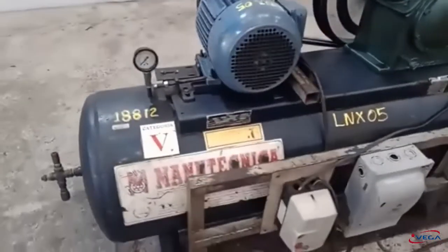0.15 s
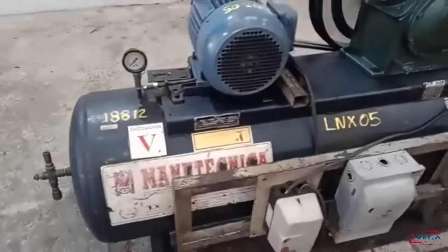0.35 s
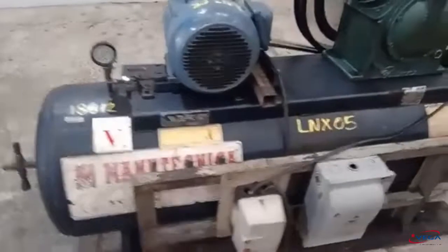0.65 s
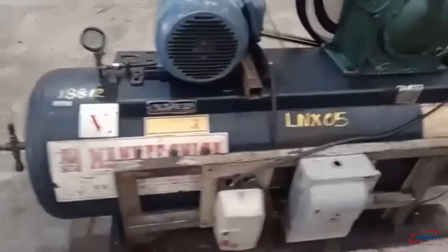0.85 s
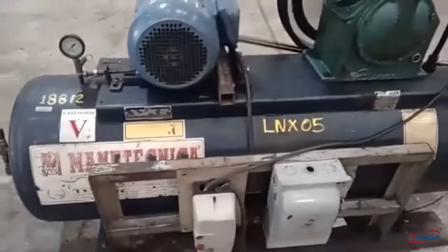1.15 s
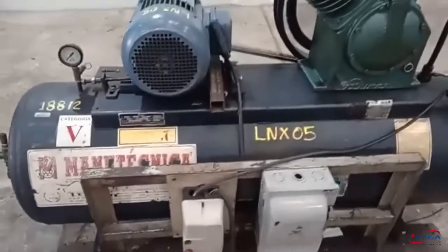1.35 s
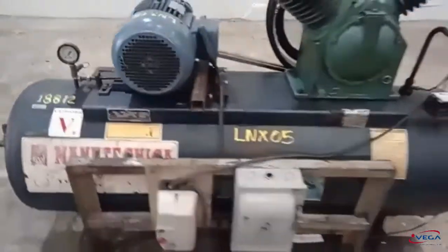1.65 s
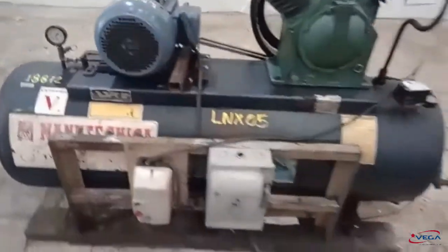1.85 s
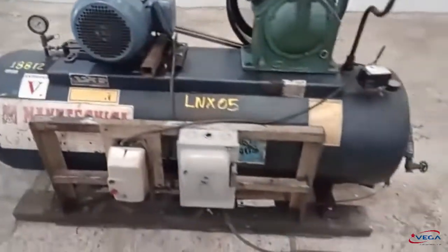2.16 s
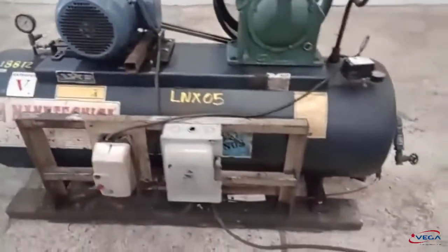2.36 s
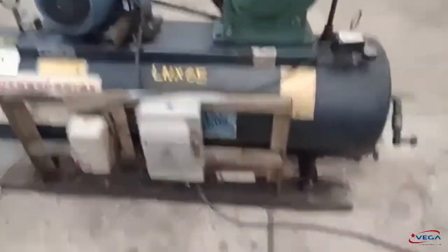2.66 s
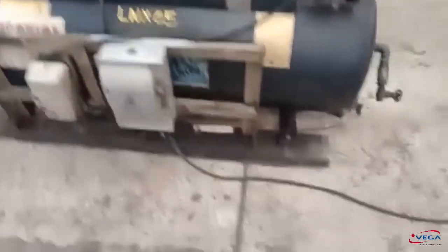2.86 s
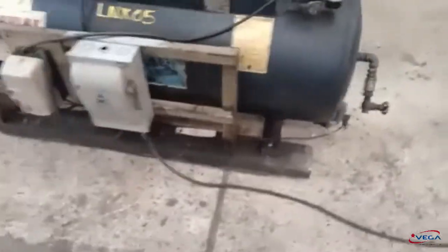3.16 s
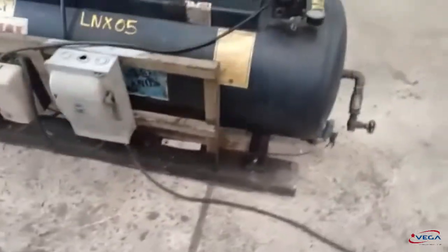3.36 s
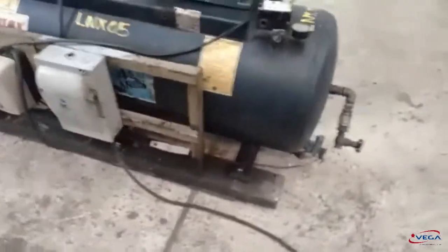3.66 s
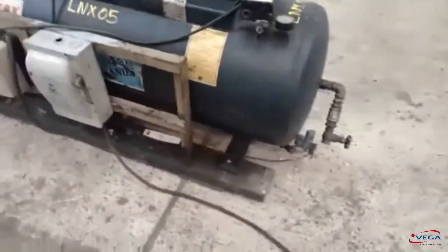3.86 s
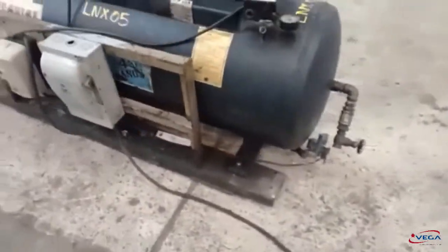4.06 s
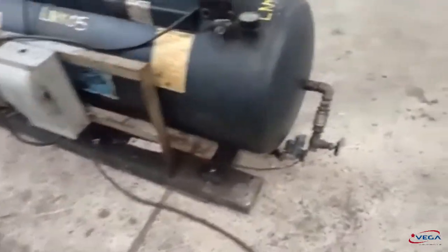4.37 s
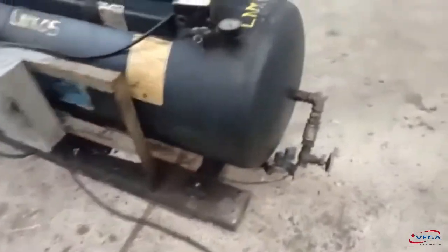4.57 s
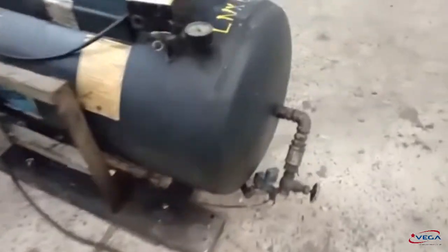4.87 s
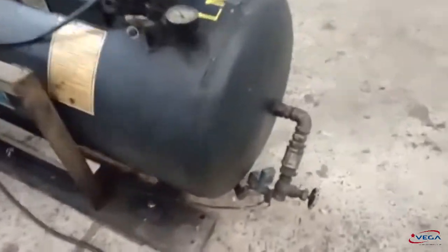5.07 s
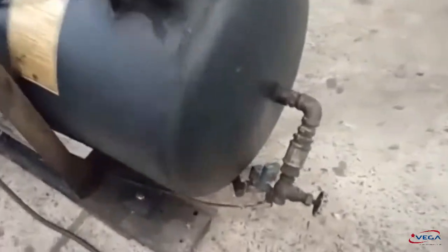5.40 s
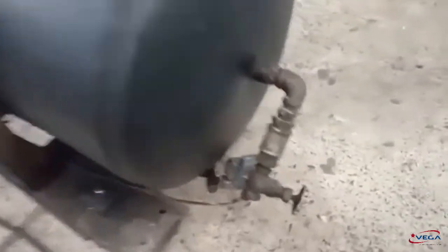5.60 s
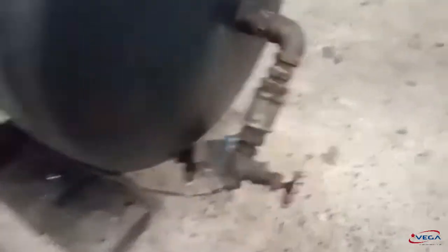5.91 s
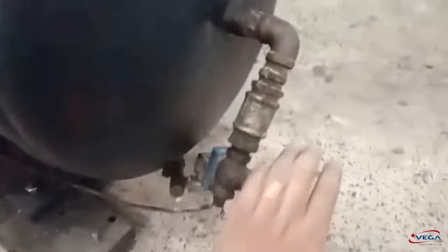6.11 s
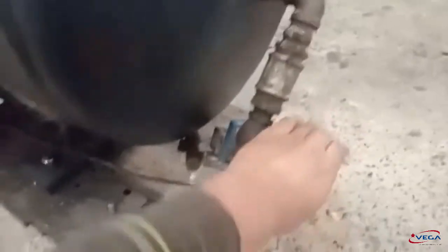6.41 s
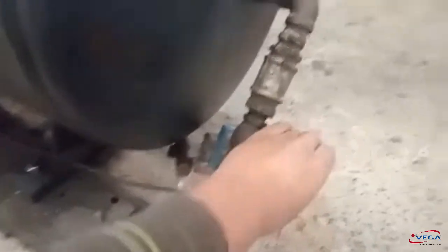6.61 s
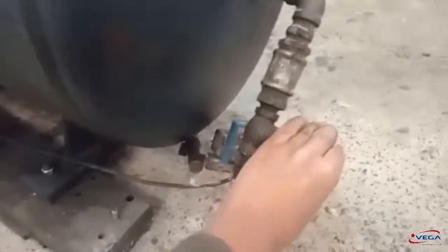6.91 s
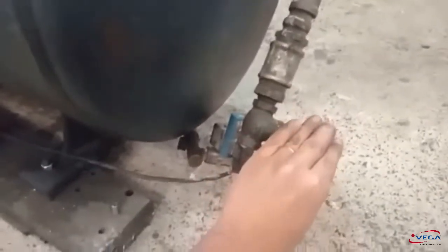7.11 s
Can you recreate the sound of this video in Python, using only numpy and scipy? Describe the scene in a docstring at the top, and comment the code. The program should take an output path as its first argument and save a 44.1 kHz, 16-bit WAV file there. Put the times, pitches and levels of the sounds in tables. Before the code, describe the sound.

In a workshop with a short echo, a belt-driven compressor putters quickly and quietly under a piercing air hiss. The microphone walks from pump to outlet valve: hiss stays almost constant in level but its tone shifts, fuller and whistlier near the pipe. Low rumble swells briefly before the tank end, then drops. Tiny dropouts roughen the sound; finally hiss covers everything.

```python
"""A compressor chugs while air hisses and whistles from a leak; the hiss shifts in level and colour.
The listener walks along the tank from the pump to the valve, and the chug fades out before the end.
The chug is a fluttering valve plate with a thump and rings, repeated each turn of the pump.
The hiss is noise shaped by pipe resonances that move during the walk; low rumble and air noise
at the microphone lie underneath."""
import sys
import numpy as np
from scipy import signal
from scipy.io import wavfile
from scipy.ndimage import uniform_filter1d

SR = 44100
rng = np.random.default_rng(int(sys.argv[2]) if len(sys.argv) > 2 else 0)


def generate_wav(sig):
    """Save sig (samples, or channels by samples) to the path in sys.argv[1] as 16-bit PCM at SR."""
    pcm = np.round(np.clip(np.atleast_2d(sig).T, -1, 1) * 32767).astype(np.int16)
    wavfile.write(sys.argv[1], SR, pcm)


def voltage_ratio(decibels):
    """Convert decibels (scalar or array-like) to amplitude ratios, 20 dB per decade."""
    exponent = np.asarray(decibels, float) / 20
    return 10 ** exponent


N = 319725  # length in samples

# The walk to the valve: t/s, nearness (0 far to 1 near), centre of the main hiss band f/Hz,
# second band level/dB, treble level/dB
WALK_TO_VALVE = [(0, 0.3, 6040, -30, -30.5), (1.25, 0.23, 5840, -30, -32), (1.5, 0.3, 5930, -25.5, -31),
                 (1.75, .05, 5800, -30, -31.5), (2.3, 0, 5950, -32.5, -31.5), (2.75, 0.4, 5200, -21.5, -35),
                 (3.0, 0.05, 5730, -26, -30), (3.3, .2, 6330, -23.5, -28), (3.75, 0.1, 6200, -24.5, -24.5),
                 (4.2, 0.2, 6400, -36.5, -29), (4.5, 0.3, 6440, -26.5, -27.5), (5.0, 0.2, 6800, -27, -27.5),
                 (5.4, .8, 6840, -21, -29.5), (5.75, 1, 6850, -19, -28), (6.1, 1, 6740, -20.5, -27.5),
                 (7.25, 0.9, 6480, -21, -27)]


def evened(x):
    """Scales to rms 1."""
    return x / np.sqrt(np.mean(x ** 2) + 1e-20)


def columns(rows, t):
    """Reads every column of a curve table at the times t."""
    s, *rest = np.transpose(rows)
    return [np.interp(t, s, column) for column in rest]


def unit(gain):
    """Scales a spectrum to unit power in every frame."""
    return gain / np.sqrt((gain ** 2).sum(-1, keepdims=True))


def colour(points, hz):
    """Turns a spectrum table, read on a log frequency axis, into a gain of unit power."""
    f, db = np.transpose(points)
    curve_db = np.interp(np.log(hz + 1), np.log(f + 1), db)
    return unit(voltage_ratio(curve_db) * np.ones((1, 1)))


def bump(shape, hz, centre_hz):
    """Carries a resonance shape along a moving centre, at unit power."""
    offset_hz, db = np.transpose(shape)
    return unit(voltage_ratio(np.interp(hz[None] - centre_hz[:, None], offset_hz, db)))


def noise(gain, size):
    """Noise from random short-time spectra, frames x bins; unit power per frame gives rms 1."""
    a, b = rng.standard_normal((2,) + gain.shape)
    spectra = a + 1j * b
    flat = signal.istft(spectra.T, nperseg=size, noverlap=size * 3 // 4)[1]
    x = signal.istft((spectra * gain).T, nperseg=size, noverlap=size * 3 // 4)[1]
    return x[:N] * np.sqrt(gain.shape[1]) / np.std(flat)


def patches(frames, bins, long, wide):
    """Random field of rms 1, smoothed over time and frequency."""
    field = rng.standard_normal((frames, bins))
    smooth = uniform_filter1d(field, long, axis=0)
    return evened(uniform_filter1d(smooth, wide, axis=1))


def resonate(x, hz, width):
    """A resonance of gain 1 at hz: a wider one dies away faster."""
    pole = np.exp((2j * np.pi * hz - np.pi * width) / SR)
    return 2 * signal.lfilter([1 - abs(pole)], [1, -pole], x).real


def ring(x, modes):
    """Blows into a set of modes, each ringing at its own pitch; rms 1."""
    total = 0
    for hz, width, db in modes:
        total = total + voltage_ratio(db) * resonate(resonate(x, hz, width), hz, 290) / width
    return evened(total)


def rumble():
    """Low noise of motor, belt and hall, with air and hand noise at the microphone."""
    # Loudness of the rumble over time: t/s, level/dB
    rumble_level = [(0, -38), (.66, -35.5), (2.44, -36), (2.82, -31.5), (3.0, -48), (3.65, -48),
                    (4.18, -38), (5.5, -39.5), (7.25, -33)]
    # Colour of the rumble: f/Hz, relative level/dB
    rumble_colour = [(35, -41), (60, -3), (155, 4), (284, 5), (402, 7.5), (496, -5), (579, 7), (766, 3),
                     (893, 8.5), (1360, -16.5), (1700, 8.5), (2210, 11), (3740, -120)]
    # Colour of the air and hand noise: f/Hz, relative level/dB
    handling_colour = [(8.8, -32), (15, 5), (110, 11), (140, -31), (240, -120)]
    hand_far_db, hand_near_db, hand_lumps_db = -71, -51.5, -0.5  # grows towards the valve

    hz, t = np.fft.rfftfreq(2048, 1 / SR), np.arange(N // 512 + 5) * 512 / SR
    rumble_db = columns(rumble_level, t)[0]
    near = columns(WALK_TO_VALVE, t)[0]
    hand_db = hand_far_db + (hand_near_db - hand_far_db) * near
    hand_db = hand_db + hand_lumps_db * patches(len(t), 1, long=20, wide=1)[:, 0]
    rumble_gain = voltage_ratio(rumble_db)[:, None] * colour(rumble_colour, hz)
    hand_gain = voltage_ratio(hand_db)[:, None] * colour(handling_colour, hz)
    lumps_db = 3.4 * patches(len(t), len(hz), long=5, wide=6)
    return noise(np.hypot(rumble_gain, hand_gain) * voltage_ratio(lumps_db), size=2048)


def pump():
    """Each turn the valve snaps open with a thump, flutters as air rushes in and rings intake and head."""
    # What reaches the listener of each stroke on the way through the standing waves:
    # t/s, flutter tone level/dB, its octave level/dB, third harmonic level/dB, head ring level/dB
    chug_levels = [(.07, -38, -33.5, -44, -37), (.5, -45, -34, -59, -46), (.75, -48, -42.5, -45, -44),
                   (1.15, -49, -43.5, -48.5, -45), (1.55, -39, -39, -36, -37.5),
                   (1.95, -36.5, -41.5, -44, -51), (2.35, -37, -60, -49, -51),
                   (2.72, -28.5, -38.5, -44, -43), (2.92, -34, -38, -39.5, -46), (3.12, -44, -51, -48, -42),
                   (3.33, -38, -41, -43, -41), (3.55, -46.5, -47, -64, -38.5),
                   (3.74, -44.5, -36.5, -65, -45), (4.1, -45, -42, -67, -46),
                   (4.35, -46, -37.5, -49, -44.5), (4.6, -45, -51.5, -38.5, -44.5),
                   (5.16, -49, -36.5, -53, -28.5), (5.4, -48, -47, -54, -41), (6.0, -50, -50, -62, -39.5),
                   (6.4, -54, -62, -51, -65)]
    # Ringing of the pump head: f/Hz, width/Hz, relative level/dB
    head_modes = [(1005, 38, 2), (1089, 40, 11), (1162, 24, -3.5), (1206, 51, 6)]
    # Ringing of the intake: f/Hz, width/Hz, relative level/dB
    intake_modes = [(686, 51, 4.5), (386, 43, -9.5)]
    stroke_s, first_s, flutter_hz = .10182, .0565, 297

    t = np.arange(N) / SR
    turn, since = np.divmod(t - first_s + stroke_s, stroke_s)  # turn count, seconds since it began
    luck = rng.standard_normal((int(turn[-1]) + 1, 5))[turn.astype(int)]  # no two turns are alike
    first_db, octave_db, third_db, head_db = columns(chug_levels, t)
    # Thump and intake follow only a share of the swings of the flutter and its octave
    thump_db = -51 + 0.33 * (first_db + 42)
    intake_db = -47.5 + 0.58 * (octave_db + 42)

    def window(start, rise, length, fall):
        """Opens steadily, stays open, then dies away; all times in seconds."""
        opening = np.clip((since - start) / rise, 0, 1)
        return opening * np.exp(-np.maximum(since - start - length, 0) / fall)

    out = np.zeros(N)
    harmonics = [(first_db, .002, .5), (octave_db, .006, .15), (third_db, .008, .7)]
    for k, (db, rise_s, rough) in enumerate(harmonics):
        hz = (k + 1) * flutter_hz
        gate = 0.025 + window(0.001, rise_s, .027, 0.004)
        gate = gate + 0.2 * window(0.066, 0.008, 0.013, 0.005)  # the small second cylinder follows
        glide_s = .0035 / (k + 1) ** 3 * np.exp(-since / .007)  # starts flat, then settles
        tone = np.sin(2 * np.pi * hz * (1 + .01 * luck[:, 0]) * (since + glide_s))
        # Turbulence round the fluttering plate
        swirl = evened(resonate(rng.standard_normal(N), hz, 73))
        flutter = evened(resonate(gate * (tone + rough * swirl), hz, 206))
        out += voltage_ratio(db + 1.2 * luck[:, k + 1]) * flutter

    # One click per turn, with a weaker opposite click 14.7 ms later, makes the thump
    snap = (np.diff(turn, prepend=turn[0]) > 0) * voltage_ratio(1.5 * luck[:, 4])
    bounce = snap - 0.31 * np.roll(snap, round(0.0147 * SR))
    thump = resonate(resonate(bounce, 185, 220), 180, 260) + 0.6 * resonate(bounce, 195, 70)
    out += voltage_ratio(thump_db) * evened(thump)

    # The click and the air rushing in excite the modes
    rush = snap + 0.067 * window(.001, 0.001, 0.016, 0.011) * rng.standard_normal(N)
    out += voltage_ratio(head_db) * ring(rush, head_modes)
    out += voltage_ratio(intake_db) * ring(rush, intake_modes)
    out *= np.clip((6.7 - t) / 0.24, 0, 1)  # the pump fades out under the hiss just before 6.7 s

    # Hall echo: noise that dies away by 60 dB in half a second
    echo_noise = rng.standard_normal(SR // 2) * voltage_ratio(-60 * t[:SR // 2] / .5)
    hall = evened(echo_noise) / np.sqrt(SR // 2)
    return out + voltage_ratio(-11) * signal.fftconvolve(out, hall)[:N]


def leak():
    """Jet noise through the resonances of the short valve pipe, breaking into whistles."""
    # Shape of the main pipe resonance: f/Hz from its centre, relative level/dB
    main_shape = [(-2600, -23.5), (-1300, -9), (-700, -4.5), (-250, 0), (4, -1), (256, -2), (700, -3),
                  (1300, -11.5), (2504, -20)]
    # Shape of the second pipe resonance: f/Hz from its centre, relative level/dB
    second_shape = [(-1500, -22), (-800, -5.5), (-400, 0.5), (4, 6), (329, -4), (550, -8), (1200, -24)]
    # Colour of the low part of the hiss: f/Hz, relative level/dB
    low_colour = [(760, -28), (1300, -11), (1630, -13), (2070, -4.5), (2580, -5), (2820, -9.5), (3200, -11),
                  (4160, -15), (7040, -120)]
    # Two treble colours, the second blended in over the first as the walk goes on: f/Hz, relative level/dB
    treble_colours = [(4470, -28), (7600, 2), (7970, -11), (8700, -7), (9380, 0), (9900, 6), (10500, 0.5),
                      (11900, -15.5), (12600, -13), (13200, 0), (13800, -4), (15600, -3.5)], [(4470, -18),
                      (7600, -6), (7930, -13.5), (9440, -15.5), (10600, -7.5), (12000, -20), (13500, -15),
                      (14600, -17), (15600, -14.5)]
    # What the microphone port passes best of the main band: f/Hz, relative level/dB
    port_colour = [(3000, -3.5), (4900, -7.5), (5300, -3.5), (5800, 0.5), (7000, 0), (7450, -6),
                   (7750, -26), (9000, -40)]
    # Narrow whistles heard from some spots: from t/s, to t/s, start f/Hz, end f/Hz, level/dB
    whistles = [(.1, .7, 4500, 4450, -36), (.8, 1.75, 4330, 4350, -33), (.9, 2.4, 5830, 5840, -27),
                (1.9, 2.55, 5250, 5180, -32), (2.4, 2.95, 4280, 4100, -31), (2.75, 3.15, 3750, 3520, -32),
                (2.9, 3.45, 5780, 5750, -24), (3.1, 5.3, 6480, 6600, -24), (3.25, 3.95, 3520, 3550, -31),
                (4.15, 4.35, 2150, 2150, -35), (4.3, 4.75, 4030, 4000, -30), (5.3, 6.3, 3550, 3560, -31),
                (5.55, 5.75, 5060, 5060, -33), (5.6, 7.25, 4350, 4340, -28), (6.25, 7.25, 2070, 2110, -39)]
    shade_s, shade_half_width_s, shade_db = 2.75, .15, -2.5  # one shaded spot on the walk
    corner_s = (3.05, 3.25)  # rounding the tank end, from and to
    low_far_db, low_near_db = -30, -32.5
    whistle_q = 38  # centre over width

    hz, t = np.fft.rfftfreq(2048, 1 / SR), np.arange(N // 512 + 5) * 512 / SR
    near, main_hz, second_db, treble_db = columns(WALK_TO_VALVE, t)
    main_db = -17.3 + shade_db * np.exp(-((t - shade_s) / shade_half_width_s) ** 2)
    second_hz = np.interp(t, corner_s, [4245, 4003])  # drops at the tank end
    low_db = low_far_db + (low_near_db - low_far_db) * near ** 4  # sinks right at the valve

    # Once round the tank end, at least 0.65 of the second treble colour is heard
    seen = np.maximum(near, np.interp(t, corner_s, [0, .65]))[:, None]
    far_power = colour(treble_colours[0], hz) ** 2
    near_power = colour(treble_colours[1], hz) ** 2
    treble = np.sqrt((1 - seen) * far_power + seen * near_power)

    main_band = unit(bump(main_shape, hz, main_hz) * colour(port_colour, hz))
    second_band = bump(second_shape, hz, second_hz)
    layers = [(main_db, main_band), (treble_db, treble),
              (second_db, second_band), (low_db, colour(low_colour, hz))]
    for start, end, from_hz, to_hz, db in whistles:
        centre = np.interp(t, [start, end], [from_hz, to_hz])
        outside_s = np.maximum(start - t, t - end)
        heard_db = db - 60 * np.maximum(outside_s + 0.11, 0)  # fades in and out
        heard_db += 3. * patches(len(t), 1, long=5, wide=1)[:, 0]  # and comes in fits
        whistle = 1 / (1 + (2 * whistle_q * (hz / centre[:, None] - 1)) ** 2)
        layers.append((heard_db, unit(whistle)))
    gain = np.sqrt(sum((voltage_ratio(db)[:, None] * shape) ** 2 for db, shape in layers))

    comb_db = 2.94 * patches(len(t), len(hz), long=14, wide=3)  # reflections from tank and floor
    gusts_db = 1.16 * patches(len(t), len(hz), long=3, wide=30)  # the jet wanders
    # The total level is held steady in every frame, whatever the reflections and gusts do
    power = np.linalg.norm(gain, axis=1, keepdims=True)
    jet = noise(power * unit(gain * voltage_ratio(comb_db + gusts_db)), size=2048)

    # The treble above 7800 Hz flickers with the loudness of the jet over 1.5 ms
    highpass = signal.butter(8, 7800, "high", fs=SR, output="sos")
    top = signal.sosfiltfilt(highpass, jet)
    loud = uniform_filter1d(jet ** 2, round(.0015 * SR)) / uniform_filter1d(jet ** 2, size=SR // 10)
    flicker = evened(abs(loud) ** (.75 / 2))  # three quarters of the swings in dB
    return jet + top * (flicker - 1)


def scene():
    """Leak, rumble and pump add up at one microphone."""
    return (leak() + rumble() + pump())[None]


def thinned(x):
    """At listed moments all but the loudest tones and a few stray ones falls away."""
    # Moments when the whole sound thins out: t/s, level/dB of what is left of the full sound
    thin_moments = [(.636, -16), (1.013, -18), (1.268, -18), (1.546, -15), (2.792, -13), (3.254, -14),
                    (3.345, -14), (3.474, -14), (3.55, -34), (3.657, -15), (3.755, -14), (4.262, -14),
                    (4.669, -15), (6.03, -18), (6.142, -14), (7.069, -13)]
    z = signal.stft(x, nperseg=1024, noverlap=768)[2]
    strong = abs(z) > voltage_ratio(-15) * abs(z).max(0)
    chance = rng.random((len(z), z.shape[1] // 8 + 1)) < .02
    stray = np.repeat(chance, 8, axis=1)[:, :z.shape[1]]  # each lasts eight frames
    kept = z * np.where(strong, 1, 3.5 * stray)
    bare = signal.istft(kept, nperseg=1024, noverlap=768)[1][:N]
    t, full = np.arange(N) / SR, np.ones(N)
    for s, db in thin_moments:
        length_s = .011 - .0006 * db  # deeper ones last longer
        full *= voltage_ratio(db * np.exp(-(2 * (t - s) / length_s) ** 4))
    return full * x + (1 - full) * bare


def low_pass(x):
    """Removes everything above the highest recorded frequency."""
    return signal.sosfilt(signal.butter(12, 16480, fs=SR, output="sos"), x)


def record(dry):
    """Brief thin moments, then a steep cut of everything above 15780 Hz."""
    edge = signal.firwin(1023, 15780, window=("kaiser", 9), fs=SR)
    mix = signal.oaconvolve(thinned(dry[0]), edge, "same")[None]
    return low_pass(mix)


dry = scene()
out = record(dry)
generate_wav(out)
```